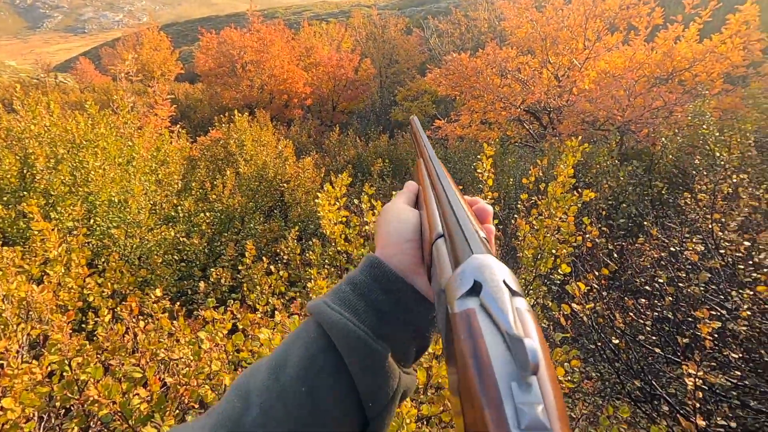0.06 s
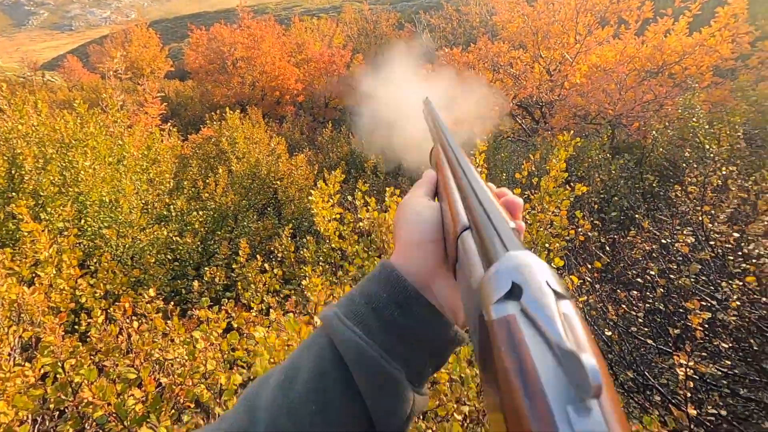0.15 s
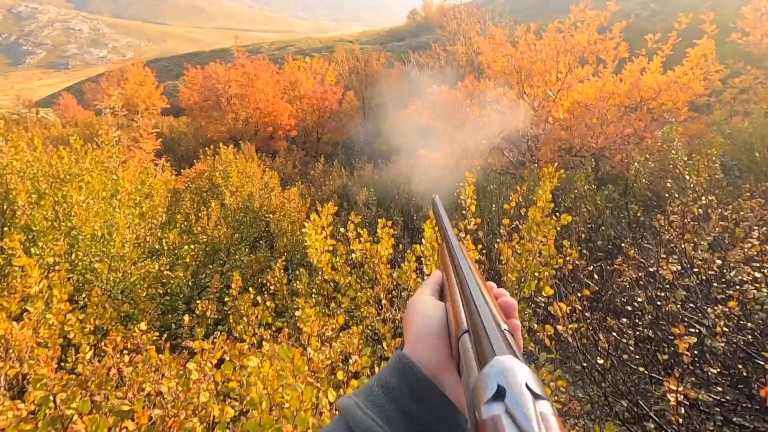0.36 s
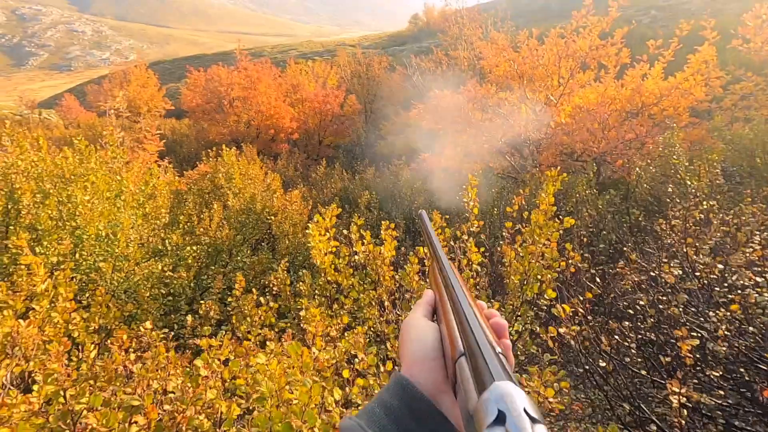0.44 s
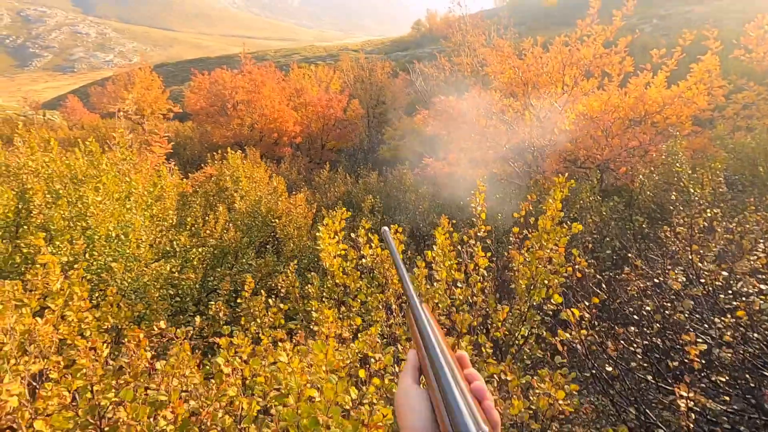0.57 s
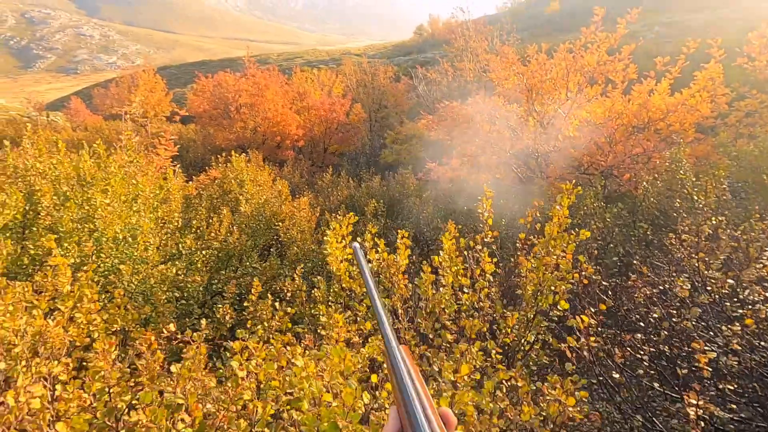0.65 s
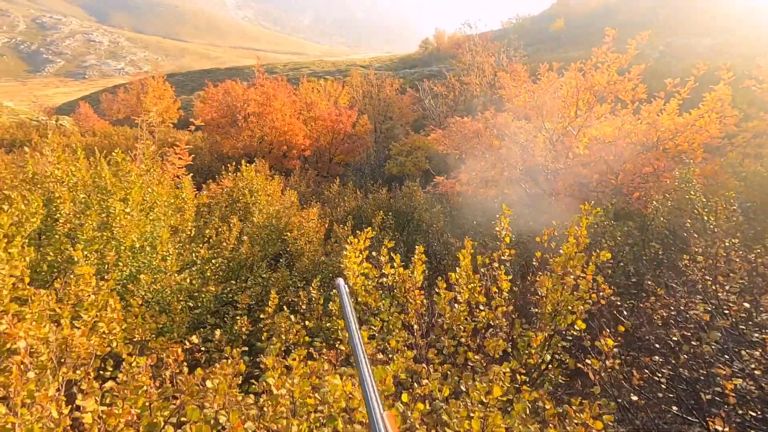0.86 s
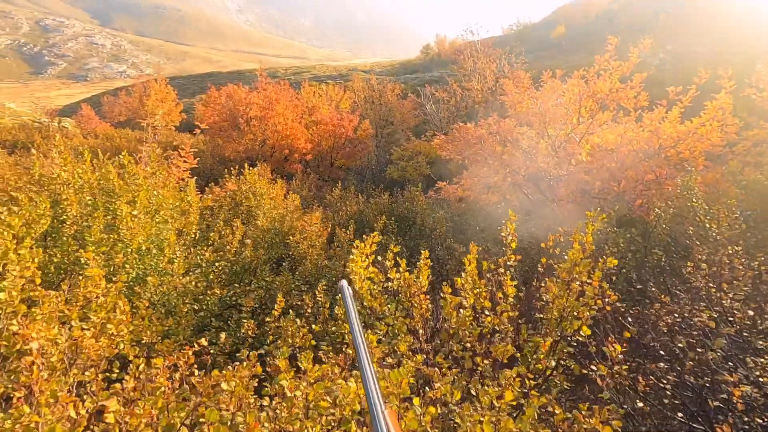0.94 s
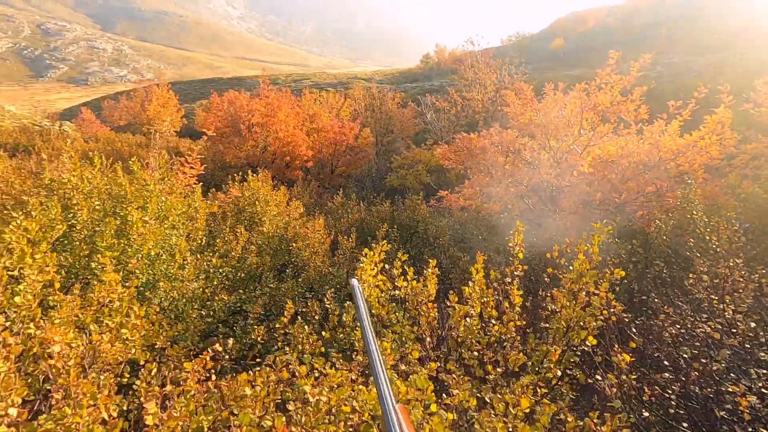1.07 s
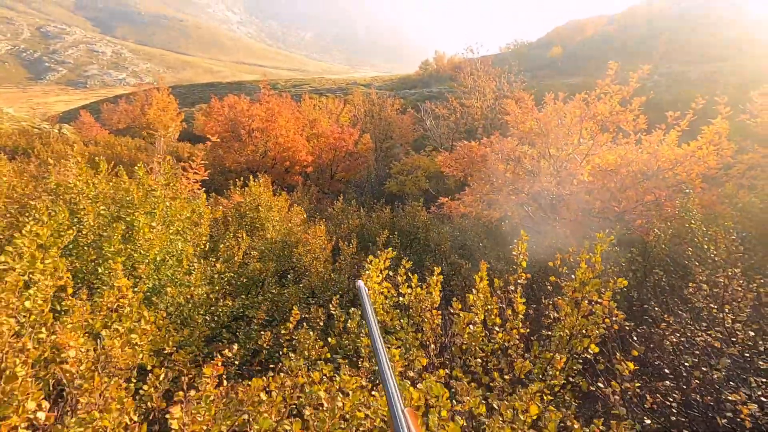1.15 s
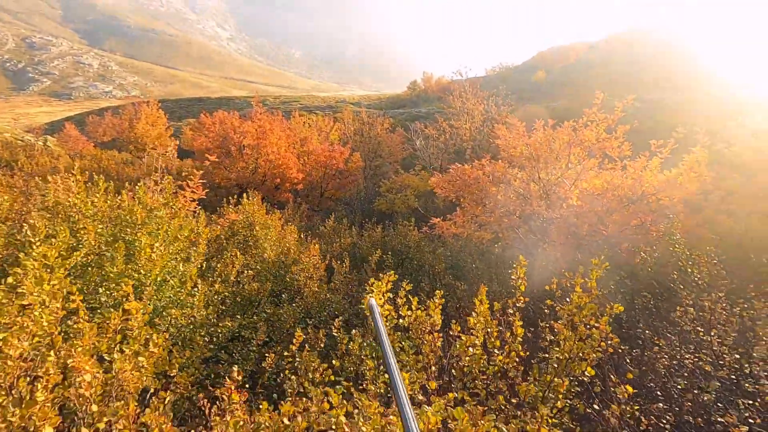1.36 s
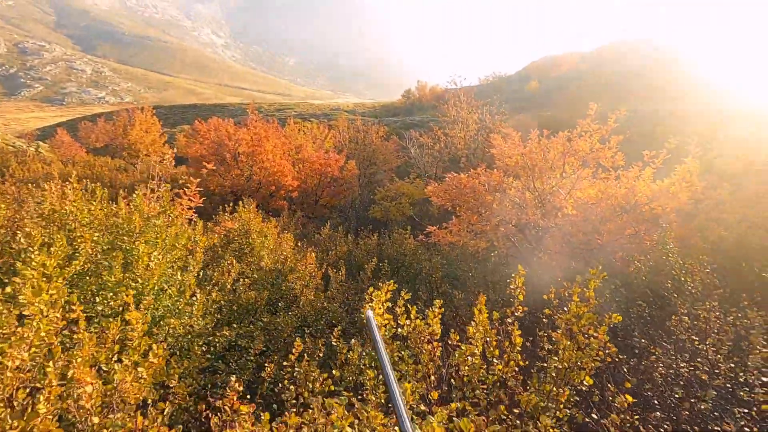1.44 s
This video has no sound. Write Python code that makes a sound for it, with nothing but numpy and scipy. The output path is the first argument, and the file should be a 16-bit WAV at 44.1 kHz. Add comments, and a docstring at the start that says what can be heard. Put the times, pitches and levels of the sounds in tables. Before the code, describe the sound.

A single shotgun shot on a brushy hillside, close in stereo. Over faint air hiss and wind, a sleeve scuffs at 0.12 s and the hammer ticks at 0.21. The blast bursts at 0.22 as a rough, overloaded stutter and crack. Booms and slaps follow, a sharp one at 0.52, with a fading roll. Metal clicks at 0.8 and faintly at 1.3; a hand bumps at 1.2, then cloth rustles.

```python
"""One shotgun shot on a brushy hillside, in stereo from just behind the gun, over faint air hiss and wind.
A sleeve scuffs and the hammer ticks: short bursts of filtered noise.
The blast is four pulses of noise, ringing and pressure, swelling and flipping sign, with sharp noise cracks.
Brush and valley return decaying noise; the slopes add booms, smeared echoes and hard slaps for over a second.
As the gun is lowered hands bump it, its metal clicks, once plainly and once faintly, and a sleeve rustles."""
import sys
import numpy as np
from scipy import signal
from scipy.fft import rfft, irfft
from scipy.io import wavfile

SR = 44100
rng = np.random.default_rng(int(sys.argv[2]) if len(sys.argv) > 2 else 0)


def master_out(mix):
    """Clip the mix to full scale and print it as 16-bit PCM to the path in sys.argv[1]."""
    frames = np.transpose(np.atleast_2d(mix))
    ceiling = np.clip(frames, -1, 1)
    pcm = np.round(ceiling * 32767).astype(np.int16)
    wavfile.write(sys.argv[1], SR, pcm)


N = 66150  # samples, 1.5 s

# stereo width of sounds close to the microphone: f/Hz, side level/dB
NEAR_WIDTH = [(60, -7), (400, -2.5), (2000, -2.5), (8000, -8)]
# stereo width of sounds away from the microphone: f/Hz, side level/dB
FAR_WIDTH = [(60, -88), (500, -20.5), (1600, -10), (8000, -14.5)]


def amp(db):
    """Decibels to gain."""
    return 10 ** (np.asarray(db) / 20)


def unit(x):
    """Scales to rms 1."""
    return x / np.sqrt(np.mean(x ** 2) + 1e-20)


def read(points, hz):
    """Reads a table on a log-frequency axis."""
    f, value = np.transpose(points)
    return np.interp(np.log(hz + 1), np.log(f + 1), value)


def since(start):
    """Seconds since start, for every sample."""
    return np.arange(N) / SR - start


def envelope(start, rise, hold, decay):
    """Linear rise, hold, exponential release; all in seconds."""
    t = since(start)
    release = np.exp(-np.maximum(t - rise - hold, 0) / decay)
    return np.clip(t / rise, 0, 1) * release


def noise(colour, width):
    """Stereo noise of a given colour and width, from random phases, rms 1."""
    hz = np.fft.rfftfreq(N, 1 / SR)
    mid, side = np.exp(2j * np.pi * rng.random((2, len(hz)))) * amp(read(colour, hz))
    side = side * amp(read(width, hz))
    return unit(irfft(np.array([mid + side, mid - side]), N))


def band_noise(centre_hz, octaves):
    """Stereo noise in a band that is bell-shaped over log frequency."""
    hz = np.geomspace(10, 20000, 60)
    bell = np.exp(-.5 * (np.log2(hz / centre_hz) / octaves) ** 2)
    return noise(np.c_[hz, 20 * np.log10(bell + 1e-4)], FAR_WIDTH)


def lumps(depth_db, length):
    """A random gain of rms 1 that wobbles on the given time scale in seconds."""
    knots = rng.standard_normal(N)
    wobble = np.interp(since(0) / length, np.arange(N), knots)
    return unit(amp(depth_db * wobble))


def lowpass(x, hz):
    """Gentle loss of treble, one pole."""
    return signal.sosfilt(signal.butter(1, min(hz, .45 * SR), fs=SR, output="sos"), x)


def air():
    """Still air hisses steadily; wind on the microphone rumbles in slow lumps."""
    # colour of the still air: f/Hz, level/dB
    air_colour = [(38, -2), (80, -19.5), (700, -28.5), (1500, -20.5), (3500, -37), (6000, -30.5),
                  (15000, -49.5)]
    # colour of the wind: f/Hz, level/dB
    wind_colour = [(38, -9), (80, -38), (1000, -74)]
    hiss = amp(-51) * noise(air_colour, NEAR_WIDTH)
    wind = amp(-48) * noise(wind_colour, FAR_WIDTH) * lumps(depth_db=3, length=0.121)
    return hiss + wind


def sleeve_scuffs():
    """Cloth drags briefly, giving short bursts of band noise."""
    # scuffs: t/s, level/dB, rise/s, decay/s, centre f/Hz
    scuffs = [(0.12, -46, 0.015, 0.021, 244), (.158, -42, 0.0029, 0.0026, 1070),
              (.189, -42.5, .001, 0.0034, 1000), (1.413, -35, 0.0028, 0.011, 940)]
    return sum(amp(db) * envelope(s, rise, 0, decay) * band_noise(hz, octaves=0.76)
               for s, db, rise, decay, hz in scuffs)


def sleeve_rustle():
    """Moving cloth gives grainy noise, and its creases crackle in random snaps of either sign."""
    # level of the sleeve's movement: t/s, level/dB
    movement = [(1.12, -82), (1.21, -48), (1.25, -51.5), (1.37, -46.5), (1.42, -40), (1.5, -39.5)]
    # colour of the cloth: f/Hz, level/dB
    cloth_colour = [(80, -3), (400, 3), (1400, -3.5), (3300, -14.5), (8000, -8.5), (15000, -32.5)]
    # colour of the dry crackle: f/Hz, level/dB
    crease_colour = [(200, -21), (1300, 0), (3500, -17), (14000, -33)]
    creases_per_s, spread_db = 500, 3.5
    snaps = (rng.random(N) < creases_per_s / SR) * rng.choice([-1, 1], N)
    snaps = snaps * amp(spread_db * rng.standard_normal(N))
    crease_gain = amp(read(crease_colour, np.fft.rfftfreq(N, 1 / SR)))
    creases = unit(irfft(rfft(snaps) * crease_gain, N))
    cloth = lumps(depth_db=3, length=.003) * noise(cloth_colour, FAR_WIDTH)
    level = amp(np.interp(since(0), *np.transpose(movement)))
    return level * (cloth + amp(-5.5) * creases)


def hand_bumps():
    """Hands bump softly on the gun: dull noise under short envelopes."""
    # bumps: t/s, level/dB, rise/s, decay/s
    bumps = [(0.765, -36, 0.021, 0.044), (1.213, -31, 0.0022, 0.0077)]
    # colour of a bump: f/Hz, level/dB
    bump_colour = [(140, 0.5), (350, -12.5), (14000, -43)]
    level = sum(amp(db) * envelope(s, rise, 0, decay) for s, db, rise, decay in bumps)
    return level * noise(bump_colour, FAR_WIDTH)


def metal_clicks():
    """The gun's metal clicks: bright noise with a fast decay and a weaker, longer one."""
    # clicks: t/s, level/dB, decay/s
    clicks = [(0.802, -23, 0.0021), (1.2976, -40.5, 0.0021)]
    # colour of a click: f/Hz, level/dB
    click_colour = [(200, -3), (1200, -2.5), (6000, -3), (7600, -1), (9000, -10), (12000, -7), (15500, -34)]
    level = np.zeros(N)
    for s, db, decay in clicks:
        tick = envelope(s, 0.00027, 0, decay)
        ring = amp(-13) * envelope(s, 0.00074, 0, 0.017)
        level += amp(db) * (tick + ring)
    return level * noise(click_colour, FAR_WIDTH)


def brush_and_valley(count=24):
    """Close brush scatters the shot briefly; the valley rolls on, each band dying at its own speed."""
    # scatter and roll, levels relative to the falling noise: f/Hz, brush level/dB, roll level/dB, roll t60/s
    returns = [(40, -34, -41, 0.88), (85, -12, -28, 1.2), (160, -29, -19.5, 1.74), (330, -25, -25, 2.77),
               (700, -30, -21, 2.64), (1490, -15.5, -24.5, 3.6), (2430, -20, -28.5, 3.07),
               (5150, -12, -23.5, 1.97), (7360, -12, -28.5, 1.67), (14000, -30.5, -51, 1.65)]
    start_s, rise_s, brush_t60_s = .247, 0.0014, 0.26
    hz, centres = np.fft.rfftfreq(N, 1 / SR), np.geomspace(30, 16000, count)
    falling = [(0, -40), (25, 0), (20000, -29)]  # f/Hz, level/dB
    f, brush_db, roll_db, t60 = np.transpose(returns)
    brush = irfft(rfft(noise(falling, NEAR_WIDTH)) * amp(read(np.c_[f, brush_db], hz)), N)
    roll = rfft(noise(falling, FAR_WIDTH)) * amp(read(np.c_[f, roll_db], hz))
    # t60 is the time to fall 60 dB, a factor of 1000
    total = brush * envelope(start_s, rise_s, 0, brush_t60_s / np.log(1000))
    for centre in centres:
        overlap = read(np.c_[centres, centres == centre], hz)  # triangular band around this centre
        band = irfft(roll * overlap, N)
        total += band * envelope(start_s, rise_s, 0, read(np.c_[f, t60], centre) / np.log(1000))
    return total * lumps(depth_db=1.5, length=.006)


def hill_booms():
    """A dense low boom rolls off the hill: band noise with its own swells partly evened out."""
    # booms: t/s, level/dB, rise/s, decay/s, centre f/Hz
    booms = [(.338, -24.5, 0.0073, 0.056, 84), (.372, -29.5, .015, 0.11, 47), (.358, -25, 0.013, .15, 204)]
    evenness = 0.67  # 0 leaves the swells alone
    total = np.zeros((2, N))
    for s, db, rise, decay, hz in booms:
        rumble = band_noise(hz, octaves=0.44)
        swell = unit(abs(signal.hilbert(rumble))) + .2
        total += amp(db) * unit(rumble / swell ** evenness) * envelope(s, rise, 0, decay)
    return total


def slope_echoes():
    """The slopes return the shot smeared into ragged noise and dulled."""
    # echoes: t/s, level/dB, rise/s, decay/s, treble edge f/Hz
    returns = [(.293, -24.5, 0.00085, 0.0049, 1500), (0.338, -19.5, 0.0052, 0.0086, 700),
               (0.353, -20, 0.011, 0.014, 1640), (0.499, -27.5, 0.0026, 0.025, 6000),
               (0.594, -25, 0.0071, 0.028, 3000), (0.633, -29.5, 0.02, 0.041, 1620),
               (0.923, -33, 0.049, 0.12, 890), (1.156, -39, 0.003, 0.025, 600)]
    # colour of an echo ahead of the dulling: f/Hz, level/dB
    echo_colour = [(50, -12), (200, -1.5), (600, 6), (1500, -5), (5000, -11), (8000, -13), (14000, -48)]
    total = np.zeros((2, N))
    for s, db, rise, decay, edge_hz in returns:
        ragged = noise(echo_colour, FAR_WIDTH) * lumps(depth_db=1.5, length=0.0014)
        total += amp(db) * unit(lowpass(ragged, edge_hz)) * envelope(s, rise, 0, decay)
    return total


def hill_slaps():
    """Single short returns, low thuds and hard slaps: a pitched pulse roughened by band noise."""
    # slaps: t/s of the peak, level/dB, pitch f/Hz, fade to either side/s
    slaps = [(.279, -11, 133, 0.0036), (.345, -14.5, 118, 0.0051), (.357, -12, 99, 0.0034),
             (0.382, -23, 107, 0.0049), (0.393, -21, 71, 0.0033), (0.5168, -11.5, 620, 0.00088),
             (0.753, -22.5, 610, 0.0039)]
    total = np.zeros((2, N))
    for s, db, hz, length in slaps:
        t = since(s)
        pulse = np.cos(2 * np.pi * hz * t) + 0.37 * band_noise(hz, octaves=0.73)
        total -= amp(db) * pulse * np.exp(-abs(t) / length)
    return total


def cracks():
    """Hammer and muzzle give millisecond bursts of ragged noise; the main one sets a hollow body ringing."""
    # two faint hammer ticks, then the muzzle: t/s, level/dB, hold/s, treble edge f/Hz
    bursts = [(0.2083, -29.5, 0.0027, 5000), (0.2127, -25, 0.0016, 6940), (0.2454, -12.5, 0.00044, 14000),
              (0.2474, -9, 0.0019, 12200), (0.2509, -7.5, 0.0036, 2240)]
    # colour of a crack ahead of the treble loss: f/Hz, level/dB
    crack_colour = [(100, 0), (550, -5), (780, -13), (1100, -6), (2600, -1), (4000, -8.5), (8000, -5.5),
                    (11000, -14.5), (15000, -29)]
    # hollow body resonances: f/Hz, level/dB, decay/s
    body_modes = [(229, -18, .013), (332, -20, 0.012), (1043, -15.5, 0.003), (1640, -14.5, 0.0024)]
    body_at_s = .2516
    total = np.zeros((2, N))
    for s, db, hold, edge_hz in bursts:
        ragged = noise(crack_colour, NEAR_WIDTH) * lumps(depth_db=2, length=.0003)
        total += amp(db) * unit(lowpass(ragged, edge_hz)) * envelope(s, 0.0006, hold, 0.00049)
    for hz, db, decay in body_modes:
        tone = np.sin(2 * np.pi * hz * since(body_at_s))
        total += amp(db) * tone * envelope(body_at_s, 0.00078, 0, decay)
    return total


def blast():
    """Pressure punch, ringing bark, fizz and slow push repeat as a swelling stutter, with a thin whistle."""
    # pulses of the stutter, each of opposite sign to the one before: level/dB
    stutter_db = [-15.5, -6, -5.5, -5]
    # colour of the bark: f/Hz, level/dB
    bark_colour = [(250, -9), (550, 3), (780, -13.5), (1050, -0.5), (1900, -6), (4200, -6.5), (7000, -24),
                   (14000, -51)]
    # colour of the fizz: f/Hz, level/dB
    fizz_colour = [(200, -12), (2600, 1), (8000, -12), (14000, -35)]
    # metal modes that ring during each pulse: f/Hz, level/dB
    metal_modes = [(2490, -9), (3150, -20.5), (3980, -19.5)]
    start_s, gap_s = .2200, .01068
    bark_s, punch_s, fizz_s = 0.0038, 0.0012, 0.011
    push_at_s, push_s = 0.0078, 0.0015
    t = np.maximum(since(start_s), 0)
    gate = envelope(start_s, 0.00035, bark_s, 0.00059)
    ring = sum(amp(db) * np.sin(2 * np.pi * hz * t) for hz, db in metal_modes)
    bark = gate * (amp(-9.5) * noise(bark_colour, NEAR_WIDTH) + ring)
    # the fizz rises ahead of the bark
    fizz_level = amp(-19.5) * envelope(start_s - fizz_s, fizz_s, fizz_s, fizz_s)
    fizz = fizz_level * noise(fizz_colour, NEAR_WIDTH)
    # the punch swings from negative to positive; the push is one negative hump
    u = (t - bark_s / 2) / punch_s
    punch = amp(-6.5) * 2 * u * np.exp(-u ** 2)
    push = -amp(-5) * np.exp(-((t - push_at_s) / push_s) ** 2)
    onset = np.minimum(t / punch_s, 1)
    pulse = bark + fizz + (punch + push) * onset
    whistle = amp(-38) * np.sin(2 * np.pi * 7900 * t) * envelope(start_s, 0.0055, 0.017, .004)
    stutter = sum((-1) ** k * amp(db) * np.roll(pulse, round(k * gap_s * SR), axis=1)
                  for k, db in enumerate(stutter_db))
    return whistle + stutter


def scene():
    """The air, the handling of the gun, the returns from the hillside and the shot."""
    handling = sleeve_scuffs() + sleeve_rustle() + hand_bumps() + metal_clicks()
    hillside = brush_and_valley() + hill_booms() + slope_echoes() + hill_slaps()
    return air() + handling + hillside + cracks() + blast()


def record(dry):
    """The microphone overloads on the peaks of the blast; then the band limit."""
    ceiling, edge_hz = 1.0, 15400
    squashed = dry / (1 + (dry / ceiling) ** 6) ** (1 / 6)
    band_limit = signal.firwin(301, edge_hz, window=("kaiser", 9), fs=SR)
    return signal.oaconvolve(squashed, band_limit[None], "same")


dry = scene()
out = record(dry)
master_out(out)
```